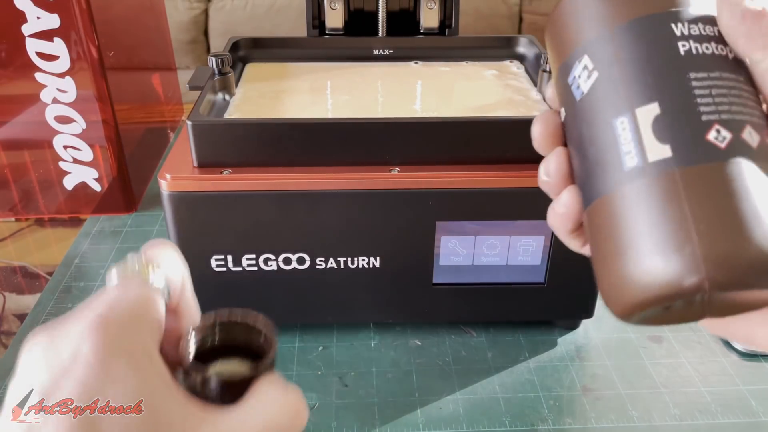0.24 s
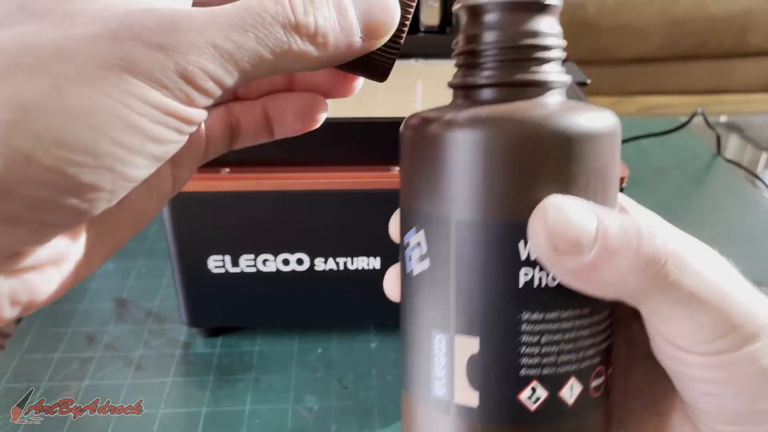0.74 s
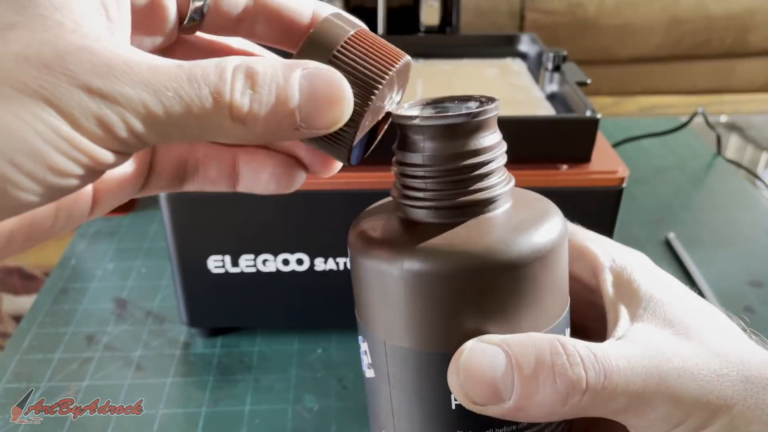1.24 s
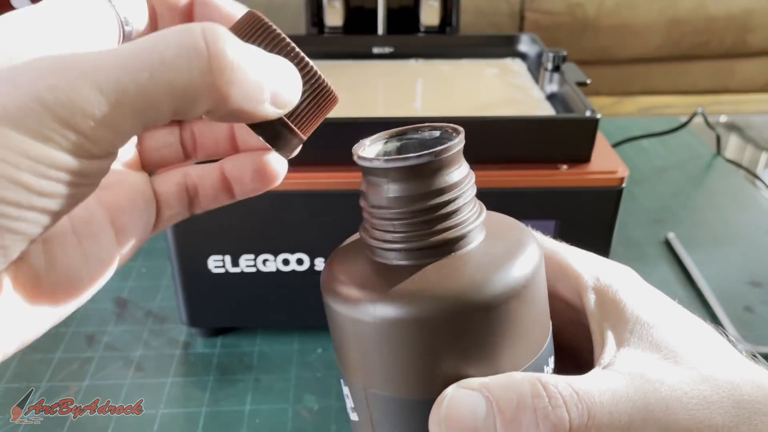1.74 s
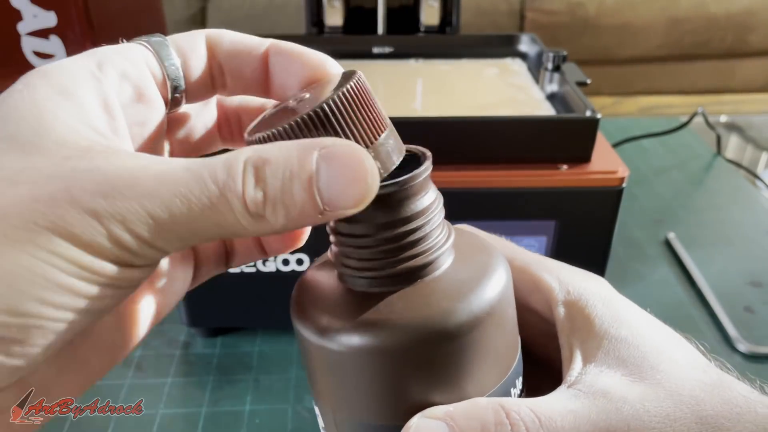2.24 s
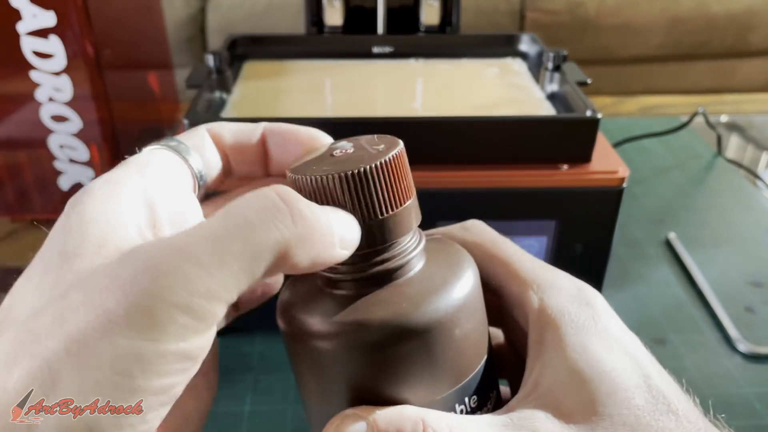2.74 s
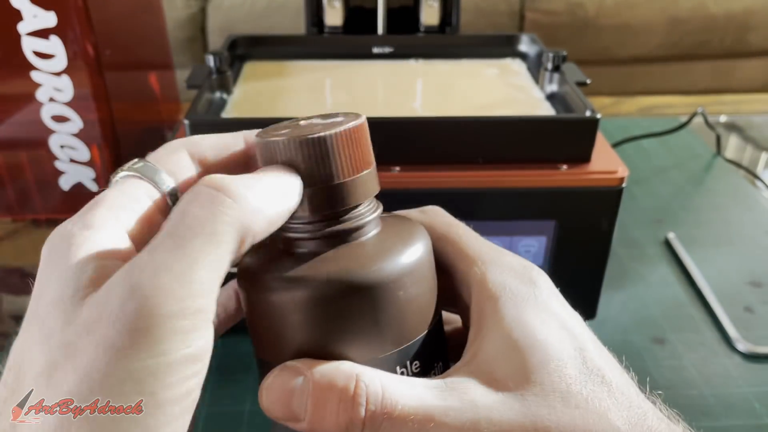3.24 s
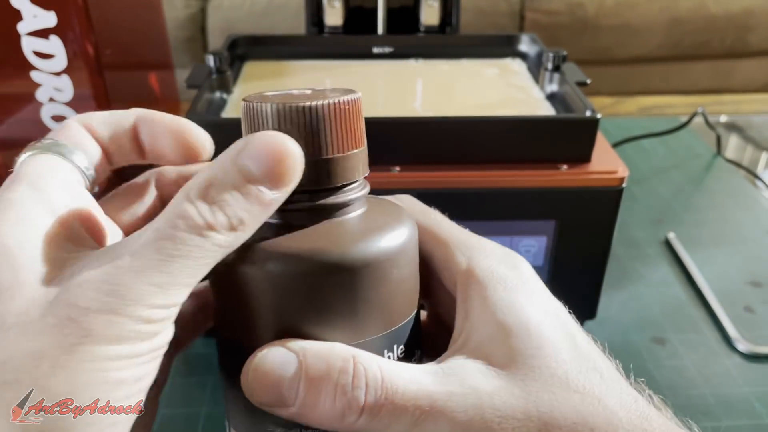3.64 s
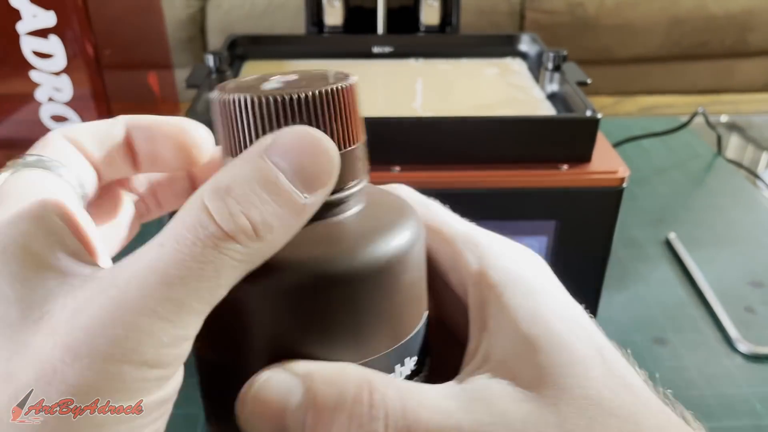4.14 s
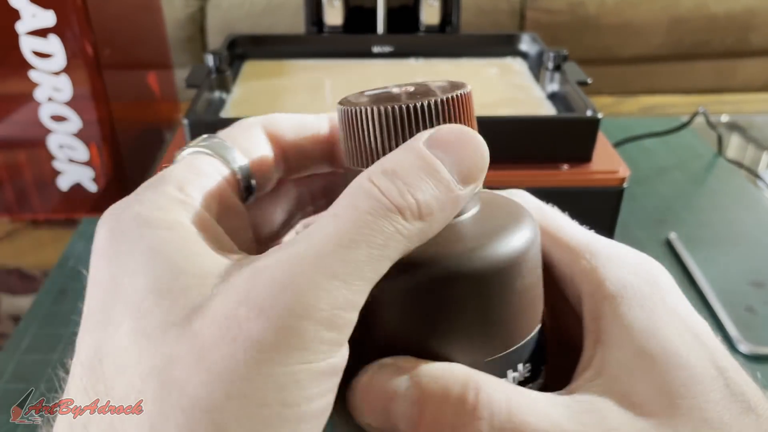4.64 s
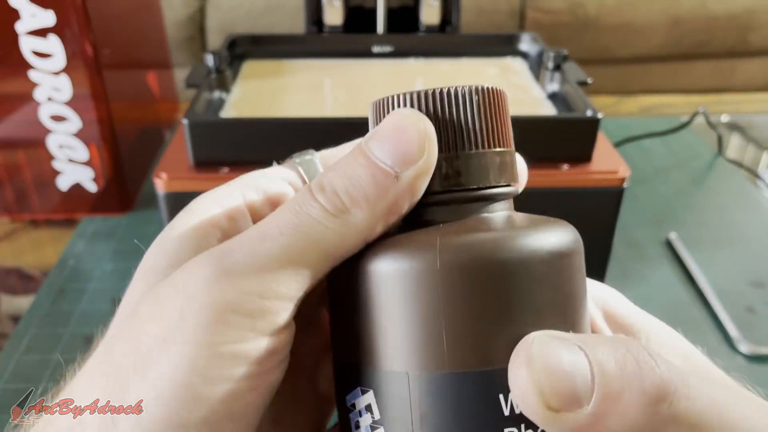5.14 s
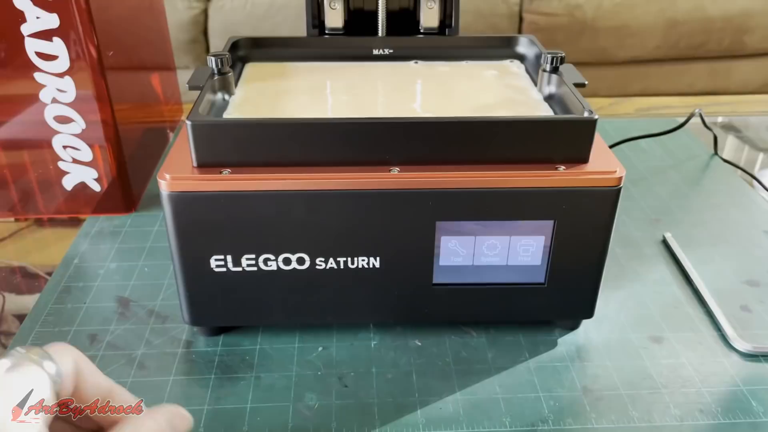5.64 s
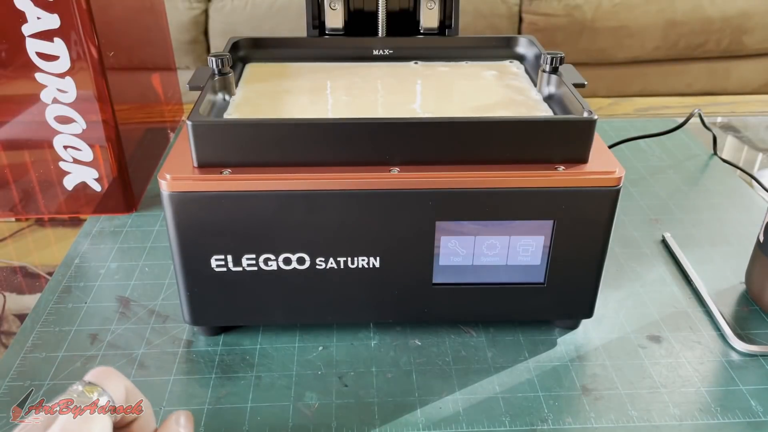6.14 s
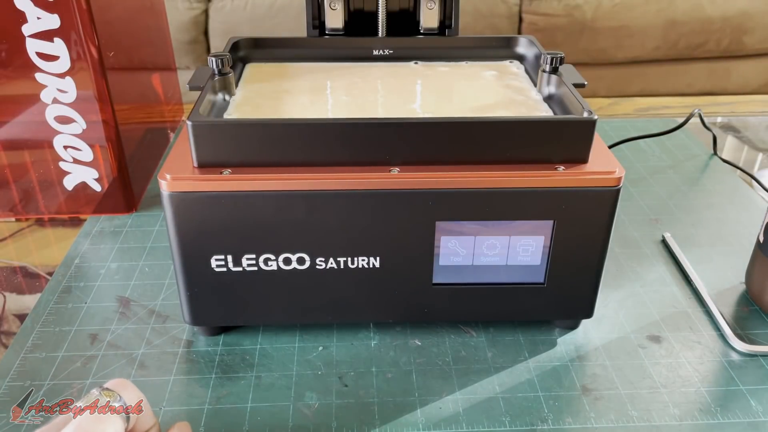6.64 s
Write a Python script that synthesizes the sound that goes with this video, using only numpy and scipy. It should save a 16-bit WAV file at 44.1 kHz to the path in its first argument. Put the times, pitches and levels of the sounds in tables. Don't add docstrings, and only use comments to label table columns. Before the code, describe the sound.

In a furnished room with a faint low fan hum, fingers brush a ribbed plastic cap close to a stereo microphone. The cap knocks a bottle neck and the air inside sings softly. It rattles into the thread with a sharp clack, is twisted in short scraping turns with knocks and snaps, tightens in dull jerks, and finally the bottle thumps on a resonant table.

```python
import sys
import numpy as np
from scipy import signal
from scipy.fft import rfft, irfft, next_fast_len
from scipy.io import wavfile
from scipy.ndimage import uniform_filter1d, map_coordinates

SR = 44100
rng = np.random.default_rng(int(sys.argv[2]) if len(sys.argv) > 2 else 0)


def ratio_of_db(decibels):
    return 10 ** (np.asarray(decibels, float) / 20)


def file_out(sig):
    cols = np.atleast_2d(sig).T
    lim = np.clip(cols, -1, 1)
    pcm = np.round(lim * 32767).astype(np.int16)
    wavfile.write(sys.argv[1], SR, pcm)


N = 303540

# (centre [Hz], width [Hz], level [dB])
NECK_MODES = [(448, 58, 2.5), (723, 170, -6), (909, 61, 1)]
# (centre [Hz], width [Hz], level [dB])
THREAD_MODES = [(1250, 290, -6), (2120, 380, 0.5), (3030, 320, 0), (3675, 810, -7.5)]


def unit(x):
    return x / np.sqrt(np.mean(x ** 2) + 1e-20)


def along(points, hz):
    f, v = np.transpose(points)
    return np.interp(np.log(hz + 1), np.log(f + 1), v)


def curves(rows):
    s, *cols = np.transpose(rows)
    return [np.interp(np.arange(N) / SR, s, c) for c in cols]


def wobble(rate):
    knots = rng.standard_normal(int(N * rate / SR) + 4)
    return map_coordinates(knots, [np.arange(N) * rate / SR])


def hissing():
    return rng.standard_normal((2, N))


def filtered(x, response):
    m = next_fast_len(N + SR // 2)
    return irfft(rfft(x, m) * response(np.fft.rfftfreq(m, 1 / SR)), m)[..., :N]


def resonances(modes):
    def response(f):
        return sum((-1) ** k * ratio_of_db(db) * 1j * f * w / (c * c - f * f + 1j * f * w)
                   for k, (c, w, db) in enumerate(modes))
    return response


def colour(spectrum):
    below, above = (spectrum[0][0] / 2, -70), (spectrum[-1][0] * 3.9, -70)
    return lambda hz: ratio_of_db(along([below] + list(spectrum) + [above], hz))


def pair(raw, gain, patchy_db=0):
    # (frequency [Hz], likeness [0-1])
    likeness = [(60, 0.78), (300, 1), (700, 0.61), (1500, 0.57), (4000, 0.098), (6500, 0.87), (8300, 0.46),
                (9500, 0.53), (15000, 0.33)]
    z = signal.stft(raw, nperseg=512)[2]
    field = uniform_filter1d(rng.standard_normal(z.shape[1:]), size=8, axis=0)
    field = uniform_filter1d(field, size=9, axis=1)
    patchy = signal.istft(z * ratio_of_db(patchy_db * unit(field)), nperseg=512)[1][:, :N]

    def mixing(hz):
        turn = np.arccos(np.clip(along(likeness, hz), -1, 1)) / 2
        return gain(hz) * [np.cos(turn), np.sin(turn)]

    mid, side = filtered(patchy, mixing)
    return unit(np.array([mid + side, mid - side]))


def rings(rows):
    out, t = np.zeros(N + SR), np.arange(SR // 2) / SR
    for s, db, hz, t60, rise_ms in rows:
        shape = ratio_of_db(db - 60 * t / abs(t60)) * (1 - np.exp(-t * 1000 / abs(rise_ms)))
        out[round(s * SR):][:len(t)] += shape * np.sin(2 * np.pi * hz * t)
    return out[:N]


def shaken(ms, response, apart):
    t = np.arange(SR // 10) / SR
    life = max(ms, 0.3) / 1000
    swell = (1 - np.exp(-t / (0.15 * life))) * np.exp(-t / life)
    a, b = rng.standard_normal((2, len(t))) * swell
    spectrum = rfft([a + apart * b, a - apart * b])
    sound = irfft(spectrum * response(np.fft.rfftfreq(len(t), 1 / SR)), len(t))
    return sound / np.abs(sound.mean(axis=0)).max()


def fan():
    # (frequency [Hz], density [dB per Hz])
    rush_spectrum = [(59, -47.5), (100, -17), (201, -7.5), (269, 0.5), (301, -3), (433, -8), (528, -23),
                     (580, -15.5), (825, -13.5), (916, -19), (995, -13.5), (1070, -27), (1200, -42.5),
                     (1560, -62), (2640, -120)]
    # (frequency [Hz], density [dB per Hz])
    hiss_spectrum = [(1100, -4.5), (1400, 1), (1800, -4), (2400, -4.5), (2800, -9.5), (3700, -12),
                     (4300, -23), (6000, -32), (9000, -23.5), (13000, -47.5)]
    rush = ratio_of_db(-52 + 1.2 * wobble(2.2)) * pair(hissing(), colour(rush_spectrum), patchy_db=1)
    return rush + ratio_of_db(-71) * pair(hissing(), colour(hiss_spectrum), patchy_db=1)


def whine():
    # (centre [Hz], width [Hz], level [dB])
    bands = [(10840, 380, -85.5), (14430, 56, -106)]
    # (time [s], level [dB])
    sag = [(0, 1), (5.4, 3.5), (5.95, -6.5), (6.12, -7), (6.25, -19), (6.35, -7.5), (6.88, -4)]
    out = np.zeros((2, N))
    for hz, width, db in bands:
        narrow = pair(hissing(), lambda f: abs(resonances([(hz, width, 0)])(f)) ** 2)
        out += ratio_of_db(db + curves(sag)[0] + 1.1 * wobble(6.9)) * narrow
    return out


def strokes(rows):
    fade_db, squareness = 16, 2.6
    lean_in = 0.63
    rest_db, rest_drag_db = -103, -83.5
    s, length, db, drag_db = np.transpose(rows)[..., None]
    coarse = np.arange(0, N, 32)
    u = (coarse / SR - s) / length - lean_in
    from_top = np.abs(u / np.where(u < 0, lean_in, 1 - lean_in))
    swell = ratio_of_db(db - fade_db * np.minimum(from_top ** squareness, 20))
    full = lambda v: np.interp(np.arange(N), coarse, v.sum(axis=0))
    return full(swell) + ratio_of_db(rest_db), full(swell * ratio_of_db(drag_db)) + ratio_of_db(rest_drag_db)


def fingers():
    # (start [s], length [s], brush [dB], drag over brush [dB])
    carry = [(0.0, 0.054, -76, 17.5), (0.055, 0.052, -72.5, 12.5), (0.105, 0.064, -79, 15),
             (0.17, 0.064, -91, 18), (0.285, 0.094, -77, 16), (0.33, 0.095, -73.5, 4), (0.4, 0.078, -79, 6),
             (0.51, 0.073, -67.5, 1), (0.62, 0.044, -79, 6), (0.66, 0.069, -79, 12),
             (0.73, 0.074, -73.5, 4), (0.985, 0.038, -58.5, -11), (1.03, 0.12, -80.5, -4),
             (1.44, 0.11, -81, 15), (1.64, 0.066, -82, -1), (1.71, 0.11, -84.5, 11.5),
             (1.875, 0.046, -71, 7), (1.93, 0.12, -79, -6), (2.15, 0.11, -89.5, -13),
             (2.37, 0.15, -82.5, 15.5), (2.47, 0.15, -70, 12.5), (2.67, 0.042, -57, 6)]
    # (start [s], length [s], brush [dB], drag over brush [dB])
    twist = [(2.758, 0.18, -79, 19), (2.987, 0.19, -89, 15), (3.192, 0.13, -83.5, 17.5),
             (3.303, 0.25, -74.5, 8.5), (3.377, 0.036, -76, 16), (3.622, 0.045, -79, 2),
             (3.691, 0.27, -77, 11.5), (3.984, 0.13, -78, 14.5), (4.116, 0.039, -62.5, 4),
             (4.191, 0.13, -70, 10), (4.285, 0.096, -73, 8.5), (4.43, 0.077, -78, 11),
             (4.529, 0.073, -65, 9.5), (4.551, .03, -63.5, 9.5), (4.586, 0.1, -82, 18),
             (4.684, 0.17, -81, 18), (4.797, 0.14, -79, 17), (4.92, 0.089, -79, 18.5),
             (5.012, 0.1, -76.5, 13)]
    # (start [s], length [s], brush [dB], drag over brush [dB])
    leave = [(5.258, .14, -94, -11), (5.378, 0.075, -78.5, 3), (5.463, 0.071, -92, -6),
             (5.583, 0.053, -83.5, 16), (5.657, 0.036, -81, -7), (5.756, .1, -96, 17),
             (5.839, 0.06, -75.5, -9), (5.898, .1, -93, 4), (6.155, 0.044, -79.5, 15),
             (6.167, 0.027, -79, 10), (6.34, 0.032, -87, -0.5)]
    # (frequency [Hz], density [dB per Hz])
    brush_spectrum = [(3000, -2), (5000, -14.5), (6800, -2), (8400, -9), (9600, 2), (11000, -2.5),
                      (13500, -3), (14600, -9), (15600, -13.5)]
    # (frequency [Hz], density [dB per Hz])
    scrape_spectrum = [(900, -12), (1500, -0.5), (2500, -2), (3500, -4.5), (5000, -10), (7000, -18.5),
                       (9000, -24)]
    # (centre [Hz], width [Hz], level [dB])
    rub_modes = [(2400, 180, 0.5), (3600, 350, 2.5), (4900, 450, 3.5), (7000, 390, -3)]

    def grains(rough):
        return hissing() * ratio_of_db(rough * wobble(650) + 1.0 * wobble(40))

    def dragged(f):
        return colour(scrape_spectrum)(f) * (1 + abs(resonances(rub_modes)(f)))

    light, drag = strokes(carry + twist + leave)
    brush = light * ratio_of_db(4.5) * pair(grains(rough=1.0), colour(brush_spectrum), patchy_db=3.2)
    return brush + drag * ratio_of_db(-5.0) * pair(grains(rough=2.8), dragged, patchy_db=3.2)


def grip_rumble():
    # (time [s], level [dB])
    grip = [(0.0, -74.5), (0.4, -68.5), (0.85, -75), (1.65, -76.5), (1.8, -68), (2.15, -66.5), (2.4, -70),
            (2.7, -64), (2.95, -78), (3.3, -68.5), (3.6, -76), (4.2, -64.5), (4.6, -70), (5.1, -68.5),
            (6.12, -73), (6.25, -61), (6.55, -76), (6.88, -70.5)]
    # (frequency [Hz], density [dB per Hz])
    rumble_spectrum = [(20, -12.5), (35, -2), (55, 5), (90, 1), (150, -28), (250, -47.5)]
    return ratio_of_db(curves(grip)[0] + 3.0 + 4.6 * wobble(7.1)) * pair(hissing(), colour(rumble_spectrum))


def taps(rows, body, cap):
    # (centre [Hz], width [Hz], level [dB])
    edge_modes = [(5100, 370, 4), (5900, 620, -0.5), (7400, 2700, 6.5)]
    edge_db, crack_db = 8, 2
    dulled = lambda f: 1 / (1 + 1j * f / 6200) ** 2
    bright = lambda f: resonances([(9800, 4000, 0), (13500, 4500, 0)])(f) ** 2
    edge = lambda f: resonances(edge_modes)(f) * resonances([(6000, 4000, 0)])(f)
    knocked = lambda f: resonances(body)(f) * dulled(f)
    out = np.zeros((2, N + SR))
    for s, db, knock_db, hard_db, hz in rows:
        near_blow = lambda f: 0.44 + resonances([(hz, 1.1 * hz, 0)])(f)
        struck = lambda f: resonances(cap)(f) * near_blow(f) * dulled(f)
        soft = 1 + np.clip(-39.0 - db, 0, 18) / 9
        knock = ratio_of_db(knock_db + 5.5) * shaken(4.63 * soft, knocked, apart=0.45)
        click = shaken(1.5 * soft, struck, apart=1.0)
        tick = ratio_of_db(hard_db + edge_db) * shaken(1.3 * soft, edge, apart=0.096)
        crack = ratio_of_db(hard_db + crack_db) * shaken(1.1 * soft, bright, apart=0.4)
        sound = ratio_of_db(db - 2.0) * (knock + click + tick + crack)
        out[:, round(s * SR):round(s * SR) + sound.shape[1]] += sound
    return out[:, :N]


def cap_on_open_neck():
    # (time [s], peak [dB], body knock [dB], hardness [dB], click centre [Hz])
    contacts = [
        (0.1254, -60, -12, -5, 1230),
        (0.176, -49, -4.5, -20, 1200),
        (0.9714, -79, 10, 6, 1330),
        (1.005, -35.5, 4, -3.5, 3600),
        (1.3194, -62.5, 11.5, -32, 2400),
        (1.47, -53.5, 8.5, -27, 3600),
        (1.5105, -39, 1.5, -21, 3460),
    ]
    # (centre [Hz], width [Hz], level [dB])
    rim_modes = [(1520, 160, -0.5), (2330, 79, 1.5), (2800, 640, -5.5), (3700, 240, -5)]
    return taps(contacts, NECK_MODES, rim_modes)


def room(x):
    # (frequency [Hz], t60 [s])
    decay = [(200, .4), (2000, .62), (5500, .5), (8500, .14)]
    hz, t, z = signal.stft(rng.standard_normal((2, SR // 2)), SR, nperseg=256)
    tail = signal.istft(z * ratio_of_db(-60 * t / along(decay, hz)[:, None]), SR, nperseg=256)[1]
    late = np.pad(x, ((0, 0), (300, 0)))
    return signal.fftconvolve(late, tail / np.linalg.norm(tail[0]), axes=1)[:, :N]


def pings():
    # (time [s], peak [dB], pitch [Hz], t60 [s], rise [ms])
    struck_modes = [(1.005, -22, 3546, 0.02, 0.84), (1.0058, -31.5, 2340, 0.025, 1),
                    (1.0062, -29, 940, 0.062, 1.3), (1.0068, -26, 467, 0.04, 1.8),
                    (1.0055, -23, 712, 0.031, 0.91), (1.0056, -29, 5980, 0.013, 0.68),
                    (1.0056, -34, 6300, 0.018, .8), (1.0056, -41, 5000, 0.033, .8),
                    (1.0062, -37.5, 1580, 0.023, 0.67), (1.0062, -34, 2790, 0.021, 1),
                    (1.012, -41, 1050, 0.12, 2.4), (1.02, -66, 3660, 0.38, 8), (1.02, -70, 2350, 0.43, 8),
                    (1.13, -69, 3595, 0.19, 9.1), (2.4815, -58.5, 5300, 0.062, 1),
                    (1.0095, -48, 5660, 0.022, .6), (1.4712, -40, 928, 0.08, 2),
                    (1.4712, -53, 3700, 0.035, 1), (1.5108, -37.5, 3600, 0.015, 0.55),
                    (1.511, -40, 1050, 0.045, .6), (1.511, -36, 706, 0.029, 0.54),
                    (2.4815, -39.5, 736.5, 0.025, 1), (2.5455, -30.5, 865, 0.029, 0.78),
                    (2.5562, -29.5, 916, 0.045, 2.8), (2.712, -56.5, 1420, 0.48, 8),
                    (2.712, -56.5, 2195, 0.54, 8), (2.712, -57.5, 3003, 0.12, 8),
                    (4.1352, -23, 665, 0.025, 3), (4.4878, -34, 660, 0.031, 0.73)]
    return rings(struck_modes)


def snaps():
    # (time [s], peak [dB], centre [Hz])
    ticks = [(1.005, -29.5, 10100), (1.0052, -36.5, 14200), (1.007, -35.5, 10300), (1.5105, -48, 5460),
             (2.5445, -38.5, 6140), (2.6975, -35, 6460), (2.7023, -31, 6100), (2.7028, -34.5, 12100),
             (3.3443, -45.5, 12500), (3.3445, -52, 8500), (3.3698, -56.5, 5100), (4.0238, -63, 11000),
             (4.0295, -59, 2500), (4.0298, -53.5, 4770), (4.1347, -37, 11500), (4.2296, -42.5, 12900),
             (4.2295, -50, 10000), (4.3264, -47, 11100), (4.4466, -60, 11000), (4.4462, -67, 3000),
             (4.4884, -51, 12000), (4.4885, -59, 7000), (5.868, -57.5, 13000), (6.172, -62, 12500)]
    life_ms, wide = 0.37, 0.23
    out = np.zeros((2, N + SR))
    for s, db, hz in ticks:
        band = lambda f: resonances([(hz, wide * hz, 0)])(f) ** 2
        out[:, round(s * SR):round(s * SR) + SR // 10] += ratio_of_db(db) * shaken(life_ms, band, apart=0.2)
    return out[:, :N]


def bottle_air():
    # (time [s], peak [dB], t60 [s])
    jolts = [(1.01, -33.5, 0.45), (1.174, -40, 0.2), (1.303, -41.5, 0.36), (1.322, -36.5, 0.52),
             (1.475, -36.5, 0.13), (1.516, -35, 0.13), (1.549, -37, 0.19), (2.391, -32, 0.18),
             (2.438, -30, 0.066), (2.481, -30.5, 0.062), (2.499, -41, 0.14), (2.521, -28.5, 0.083),
             (2.544, -33.5, 0.051), (2.558, -31, 0.063)]
    # (time [s], air pitch [Hz])
    mouth = [(1.0, 294.2), (2.39, 285), (2.48, 255), (2.5, 199), (2.56, 185)]
    rise_ms = 3.8
    return rings([(s, db, np.interp(s, *np.transpose(mouth)), t60, rise_ms) for s, db, t60 in jolts])


def cap_hollow():
    # (time [s], peak [dB], t60 [s])
    hollow = [
        (2.5195, -36.5, 0.073),
        (2.5453, -32, 0.018),
        (2.5598, -31.5, 0.075),
        (2.5666, -48, 0.044),
    ]
    pitch_hz, rise_ms = 1940, 0.55
    return rings([(s, db, pitch_hz, t60, rise_ms) for s, db, t60 in hollow])


def cap_in_thread():
    # (time [s], peak [dB], body knock [dB], hardness [dB], click centre [Hz])
    seating = [
        (2.3905, -46, 4, -24, 1403),
        (2.4247, -54, 1.5, -15, 2000),
        (2.4718, -43, -5.5, -19.5, 3560),
        (2.4808, -41, 4.5, -14, 1326),
        (2.4932, -37, -2, -31.5, 2800),
        (2.5181, -31, -1, -27.5, 1928),
        (2.5445, -32, -2.5, -9.5, 2600),
        (2.5519, -44.5, 1, -20, 1922),
        (2.558, -26.5, -18.5, -30.5, 1967),
    ]
    # (time [s], peak [dB], body knock [dB], hardness [dB], click centre [Hz])
    turning = [(3.2052, -50, -0.5, -27, 1940), (3.3425, -53, 9, -5, 1300), (3.3623, -42.5, 0, -17, 1340),
               (3.3696, -34, -7, -28, 2370), (3.401, -55, 0, -12, 3200), (3.4093, -49, 0, -10, 3200),
               (3.415, -52, -5, -14, 3000), (3.445, -59.5, 3.5, -1, 1330), (3.5206, -51, -1, -25, 1310),
               (3.6445, -46.5, -3, -11.5, 3000), (3.6472, -37.5, -2.5, -35, 1290),
               (3.7979, -50, 5, -20, 1970), (3.9018, -45.5, 8, -15, 1300), (4.0291, -52.5, 3, -22, 1940),
               (4.1344, -35, 1, -8.5, 2400), (4.2277, -65.5, 15, -4, 1250), (4.3269, -51.5, 2, -6, 1360),
               (4.446, -46.5, -9.5, -15.5, 1880), (4.4875, -43, -3, -26, 2750),
               (5.428, -40, -28, -19, 2000), (5.5684, -54.5, -18, -30, 1370)]
    # (time [s], peak [dB], body knock [dB], hardness [dB], click centre [Hz])
    landing = [
        (2.665, -53, 7, -21, 1900),
        (2.68, -49, 2, -6, 3000),
        (2.6925, -33, 2, -10, 1300),
        (2.697, -25, -10, -12, 3000),
        (2.7022, -21, -12, -6, 2400),
        (2.706, -26, -8, -14, 2000),
        (2.7105, -32, -10, -14, 2100),
        (2.7175, -37, -10, -15, 3000),
    ]
    # (centre [Hz], width [Hz], level [dB])
    shoulder_modes = [(414, 190, 10.5), (660, 230, 10), (921, 162, 12.5)]
    return taps(seating + turning + landing, shoulder_modes, THREAD_MODES)


def pushes():
    # (time [s], peak [dB], pitch [Hz], t60 [s])
    thuds = [(2.522, -31.5, 193, 0.042), (2.569, -39.5, 112.8, 0.091), (2.694, -29, 275, 0.052),
             (2.7, -22, 151, 0.022), (2.714, -37, 85, 0.069), (3.373, -29.5, 300, 0.025),
             (3.38, -34, 74, 0.031), (3.649, -24, 298, 0.016), (4.87, -35, 57.7, 0.076),
             (4.909, -40, 53.4, 0.075), (5.059, -24.5, 55.7, 0.11), (5.098, -29, 74, 0.057),
             (5.138, -40, 60, 0.058), (6.1837, -17, 270, 0.02), (6.2025, -29, 239, 0.098)]
    rise_cycles, longest_rise_ms = 0.4, 3.5
    return rings([(s, db, hz, t60, min(1000 * rise_cycles / hz, longest_rise_ms)) for s, db, hz, t60 in thuds])


def clacks():
    # (time [s], peak [dB], [(centre [Hz], width [Hz], level [dB])])
    blows = [
        (2.7025, -15.5, [(890, 150, -5), (2380, 170, 0), (3010, 350, -3), (3750, 210, -2), (5450, 160, -8), (7000, 260, -17)]),
        (3.3703, -32, [(980, 170, -0.5), (1940, 70, 2.5), (2470, 220, -2.5), (3140, 220, 1), (3500, 190, -4), (4240, 240, -15)]),
        (3.647, -32, [(1010, 110, -5), (1370, 140, 1), (1770, 280, -7), (3100, 230, -5.5), (4400, 300, -24)]),
        (4.1345, -42, [(2080, 200, -4), (2920, 240, 2), (3600, 220, 5), (4740, 230, -14), (7290, 400, -19), (9400, 450, -8)]),
        (4.4883, -43.5, [(1290, 170, 1), (2130, 170, 2), (2900, 160, 3)]),
        (6.1813, -33.5, [(1750, 300, 1.5), (2650, 110, -4.5), (3820, 480, -3)]),
    ]
    rise_ms = 0.12
    rows = []
    for s, db, modes in blows:
        for hz, width, level in modes:
            t60 = np.log(1000) / (np.pi * width)
            rows.append((s, db + level + 20 * np.log10(width / 200), hz, t60, rise_ms))
    return rings(rows)


def seal():
    # (time [s], jerk peak [dB], grit [dB])
    slips = [
        (5.0296, -31, -17.5),
        (5.0473, -34.5, -19),
        (5.0644, -31.5, -17),
        (5.0834, -32, -16),
    ]
    # (centre [Hz], width [Hz], level [dB])
    tight_modes = [(91, 19.3, 5.5), (141, 57, -1), (206, 57, -2), (302, 72, -8), (433, 84, -11)]
    # (centre [Hz], width [Hz], level [dB])
    grit_modes = [(1090, 780, 0), (2000, 850, 1.5), (3800, 3700, -17)]
    give_ms = 2.5
    soft_hz = 900
    jerks, grit = np.zeros(N), np.zeros((2, N + SR))
    for s, db, grit_db in slips:
        jerks[round((s + give_ms / 1000) * SR)] = -ratio_of_db(db + 46.5)
        puff = ratio_of_db(db + grit_db + 3.0) * shaken(5, resonances(grit_modes), apart=0.55)
        grit[:, round(s * SR):round(s * SR) + SR // 10] += puff
    return filtered(jerks, lambda f: resonances(tight_modes)(f) / (1 + 1j * f / soft_hz) ** 2) + grit[:, :N]


def base_touches():
    # (time [s], peak [dB], body knock [dB], hardness [dB], click centre [Hz])
    touches = [
        (6.1809, -33.5, -3.5, -21, 1840),
        (6.2043, -41, 1, -43, 3000),
    ]
    return taps(touches, NECK_MODES, THREAD_MODES)


def set_down():
    # (time [s], level [dB])
    s, db = (6.1835, -21.5)
    # (pitch [Hz], level [dB], t60 [s])
    table_modes = [(80, -11.5, 0.5), (138, -2, 0.15), (168, -8.5, 0.5), (210, -1.5, 0.35),
                   (220, -11.5, 0.24), (291, -1, 0.13), (330.4, -3.5, .15), (428, -14, 0.22),
                   (490, -12.5, 0.095), (679, -22.5, 0.2), (1055, -6, 0.03)]
    boom_spectrum = [(60, -17), (130, 7.5), (250, 4), (480, -9), (700, -37)]
    slap_spectrum = [(500, -3.0), (1050, -5.5), (1500, -7.0), (3000, -20.0), (5500, -26.0), (6800, -51)]
    modes = [(s, db + level, hz, t60, 1.2) for hz, level, t60 in table_modes]
    near, far = rings(modes[::2]), rings(modes[1::2])
    top = near * ratio_of_db([[-2], [1]]) - far * ratio_of_db([[0.6], [-0.6]])
    t = np.abs(np.arange(N) / SR - s)
    boom = ratio_of_db(-13 - 60 * t / 0.45) * pair(hissing(), colour(boom_spectrum), patchy_db=2)
    slap = ratio_of_db(-23.5 - 60 * t / 0.48) * pair(hissing(), colour(slap_spectrum), patchy_db=3.5)
    onset = (np.arange(N) > s * SR) * (1 - np.exp(-t / 0.0012)) ** 2
    return top + ratio_of_db(db) * onset * (boom + slap)


def scene():
    background = fan() + whine() + fingers() + grip_rumble()
    contacts = cap_on_open_neck() + cap_in_thread() + base_touches()
    ringing = pings() + clacks()
    echo = ratio_of_db(-16.5) * room(contacts + ratio_of_db(-3) * ringing)
    tones = bottle_air() + cap_hollow() + pushes()
    return background + contacts + ringing + echo + snaps() + tones + seal() + set_down()


def roll_off(x):
    return signal.sosfilt(signal.butter(12, 15820, fs=SR, output="sos"), x)


def record(dry):
    # (frequency [Hz], left leads by [rad])
    lead = [(100, -0.46), (600, .5), (1800, -0.5), (3300, -0.1), (4800, 1.3), (6200, -1.4), (7600, -2),
            (9000, -3), (11000, -4.5), (13200, -5.5), (15500, -8.5)]
    # (frequency [Hz], left over right [dB])
    lean = [(100, 1.5), (300, 2.5), (1000, 3.5), (3500, 5), (6000, 3.5), (9000, 1), (14000, -1)]
    top_hz = 15810

    def microphone(hz):
        half = ratio_of_db(along(lean, hz) / 2) * np.exp(0.5j * along(lead, hz))
        low_cut = (1j * hz / (26 + 1j * hz)) ** 2
        return np.array([half, 1 / half]) * low_cut * (hz < top_hz)

    return roll_off(filtered(dry, microphone))


dry = scene()
out = record(dry)
file_out(out)
```